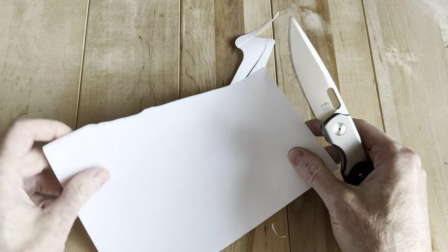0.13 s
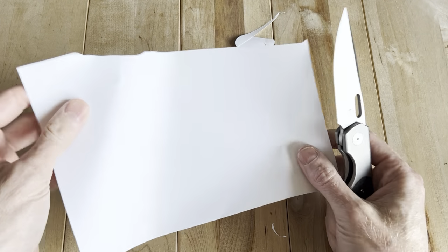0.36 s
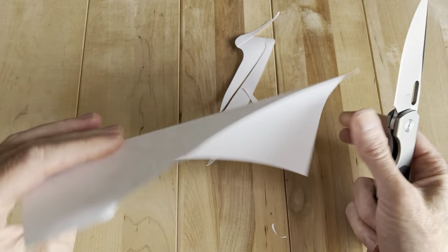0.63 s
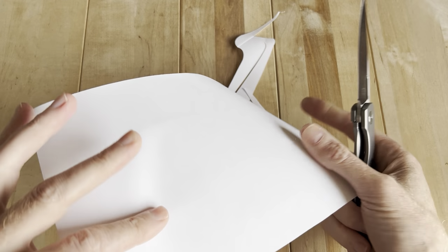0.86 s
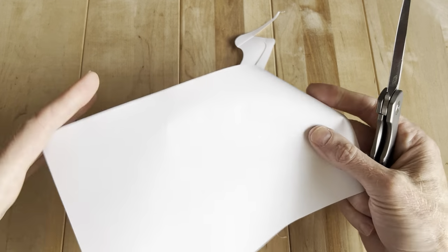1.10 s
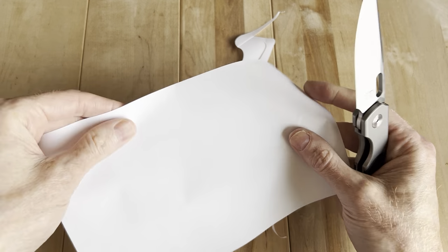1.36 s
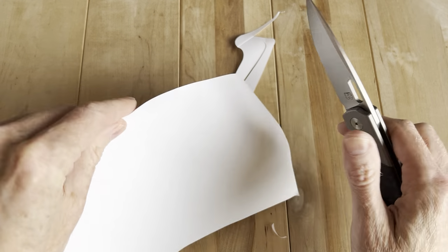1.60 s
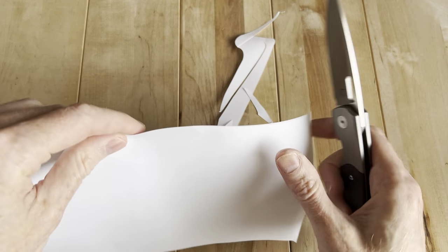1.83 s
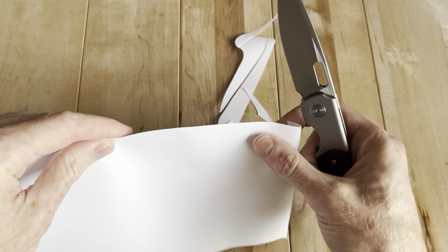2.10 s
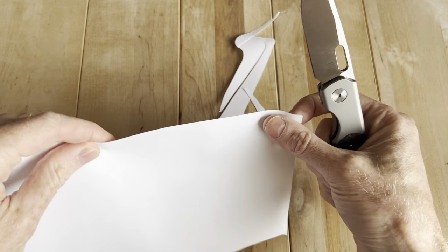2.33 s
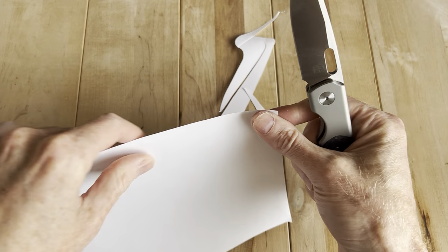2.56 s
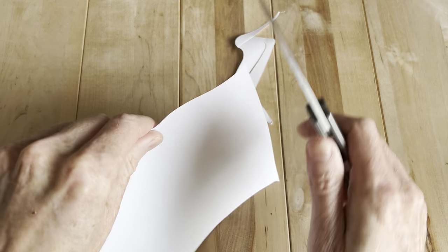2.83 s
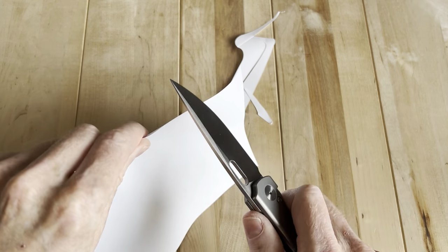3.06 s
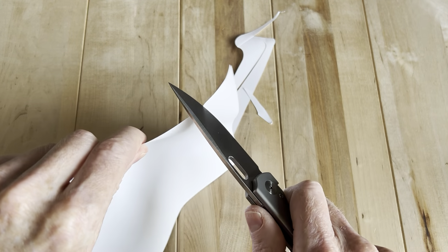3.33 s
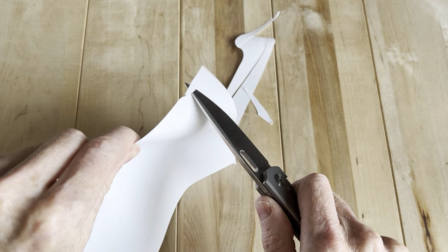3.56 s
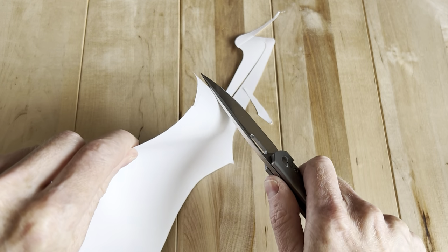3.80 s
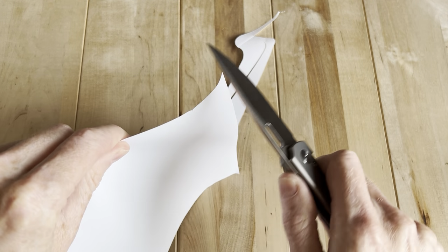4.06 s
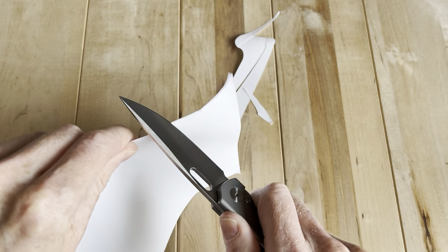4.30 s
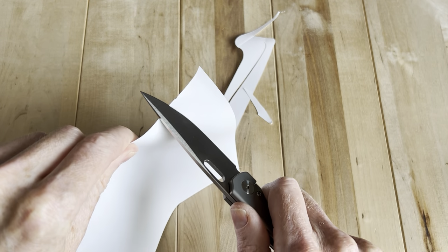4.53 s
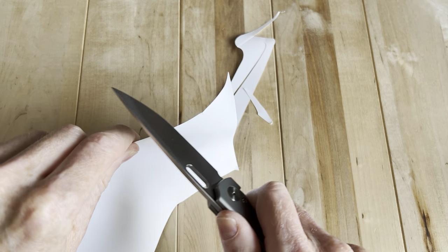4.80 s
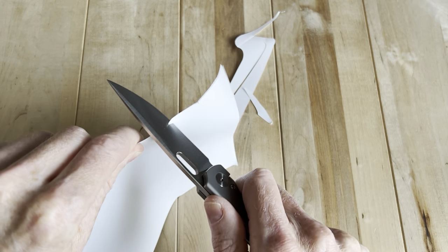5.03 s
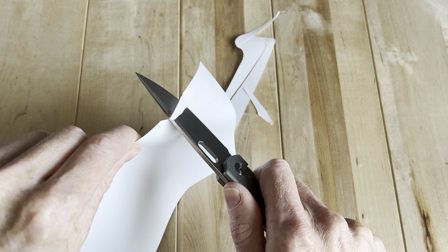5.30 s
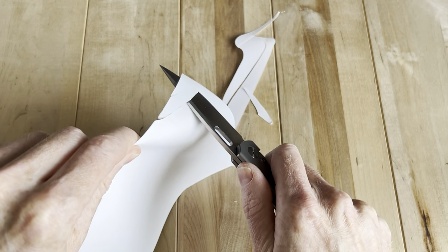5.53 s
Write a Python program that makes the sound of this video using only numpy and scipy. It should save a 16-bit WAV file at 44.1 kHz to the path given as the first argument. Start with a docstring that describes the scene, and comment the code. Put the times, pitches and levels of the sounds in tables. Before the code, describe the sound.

Paper rattles and pops as it is turned over, followed by a short bright knife cut, a brief lull, and a longer rasping cut.

```python
"""Two hands turn a sheet of paper over a wooden table, then draw a knife through it twice, close to a pair
of microphone ports. Clumped random clicks and smooth rubbing noise, filtered, make the scrape, flex and rasp;
bursts of banded noise make the snaps, crumples and rips of the sheet and one dull knock.
Low puffs and drifting low noise are the air fanned by the sheet, over short reflections and a faint hush."""
import sys
import numpy as np
from scipy import signal
from scipy.fft import rfft, irfft, next_fast_len
from scipy.io import wavfile
from scipy.ndimage import uniform_filter1d

SR = 44100
rng = np.random.default_rng(int(sys.argv[2]) if len(sys.argv) > 2 else 0)


def level_to_linear(level):
    """Convert decibel levels to linear amplitude factors, elementwise."""
    exponent = np.asarray(level, float) / 20
    return 10 ** exponent


def log_audio(samples):
    """Write samples as a 16-bit WAV file to the path given in sys.argv[1]."""
    # one column per channel
    frames = np.atleast_2d(samples).T
    # limit to full scale, then quantise
    limited = np.clip(frames, -1, 1)
    pcm = np.round(limited * 32767).astype(np.int16)
    wavfile.write(sys.argv[1], SR, pcm)


N = 249163

# grain of the tearing and rubbing: time_s, click_spread_db (negative: the rare ones are small),
# smooth_share of rub in the bending (0-1)
GRAIN = [(0, 2, 0.11), (3.35, 1, 0), (3.43, 2, 0.97), (3.62, -4, 0.75), (3.68, -3.5, 0.16),
         (3.76, 1.5, 0.85), (4.05, 0.5, 0.6), (4.2, 3, 0.24), (4.93, -1, 0.23), (5, -6, 0.74),
         (5.55, -1.5, 0.91), (5.65, -2, 0.6)]
# where the stressed sheet sings loudest: time_s, high_region_hz, low_region_hz, high_region_db re the rasp
SINGING = [(0.0,3000,800,-23.5), (0.16,2300,1290,-5), (0.4,2530,1110,-14), (0.68,2100,860,-10),
           (1.1,2520,850,-25), (1.45,2950,800,-22), (1.6,4300,800,-5.5), (1.67,3600,900,-1),
           (1.72,2740,980,-2), (2.0,2260,704,-8), (2.3,1970,850,-13), (2.55,1800,1100,-19),
           (2.83,2900,950,-2), (3.38,2500,800,-2), (3.45,2170,1000,-7), (3.51,2390,950,-14),
           (3.62,2520,920,-23), (3.68,2500,920,-19), (3.8,2780,900,-11.5), (3.91,3400,905,-30),
           (3.93,3100,900,0.5), (3.99,2600,850,9), (4.05,2300,780,7), (4.38,3150,900,-10),
           (4.5,3070,894,-9.5), (5.0,2680,1050,-5.5), (5.24,2700,700,-21), (5.39,2940,910,0.5),
           (5.47,2600,850,-1.5), (5.65,3160,800,-19)]


def rubbing():
    """Edge and fingers drag over the paper while it bends; both motions drive the sheet's sounds."""
    # hands turning the sheet over: time_s, sliding_db, bending_db
    turning = [(0.0,-48.5,-58.5), (0.08,-50.5,-62.5), (0.14,-46.5,-53.5), (0.23,-57,-52.5),
               (0.285,-58,-45.5), (0.31,-54,-63), (0.37,-51,-55), (0.425,-59,-60), (0.445,-54,-56),
               (0.5,-46.5,-50.5), (0.6,-52.5,-47), (0.72,-63.5,-52.5), (0.8,-56,-54), (0.88,-63.5,-54.5),
               (0.97,-47,-39), (1.02,-52.5,-57), (1.05,-57,-64), (1.07,-49,-46), (1.15,-56,-40),
               (1.2,-54,-45), (1.24,-59,-50), (1.28,-54,-47), (1.3,-56,-56), (1.33,-48,-35), (1.41,-40,-48),
               (1.46,-47,-47.5), (1.51,-53,-44.5), (1.545,-60,-57.5), (1.58,-57,-61), (1.61,-50,-47.5),
               (1.66,-50.5,-57.5), (1.71,-43.5,-51), (1.78,-52.5,-44), (1.84,-63,-68), (1.88,-76,-44),
               (1.92,-61,-54), (1.97,-60,-45), (2.1,-58,-57), (2.17,-54,-47), (2.265,-55.5,-59),
               (2.29,-53,-55), (2.35,-57.5,-48.5), (2.48,-57.5,-44), (2.62,-57.5,-57), (2.7,-64,-44),
               (2.82,-59,-52.5), (2.89,-59,-56), (3.05,-58,-64.5), (3.2,-61.5,-58.5), (3.24,-65,-46),
               (3.35,-59,-62), (3.39,-62,-47.5)]
    # hands holding the sheet between the cuts: time_s, sliding_db, bending_db
    holding = [(3.73,-43.5,-51), (3.794,-47.5,-63), (3.915,-51,-65), (3.925,-47.5,-53), (3.99,-59,-58),
               (4.04,-63,-63), (4.065,-75,-63), (4.124,-72,-65), (4.19,-73,-70.5), (4.3,-81,-65),
               (4.37,-53,-60.5), (4.4,-43.5,-47.5), (4.43,-42,-49), (4.455,-38.5,-48), (4.47,-44,-43),
               (4.485,-47,-51.5), (4.538,-53,-54), (4.63,-60,-61), (4.66,-61,-66), (4.722,-64,-71),
               (4.821,-73.5,-89), (4.86,-62.5,-72), (4.9,-59.5,-73), (4.93,-63,-81)]
    # two knife cuts, each a list of: time_s, tearing_db, bending_db
    cuts = [
        [(3.41, -40.5, -55.5), (3.456, -37.5, -46.5), (3.558, -33.5, -42.5), (3.586, -35.5, -40),
         (3.64, -30.5, -46), (3.656, -29, -39), (3.704, -29.5, -36.5), (3.715, -34, -49)],
        [(4.97, -46, -56), (5.004, -35.5, -50), (5.044, -34, -43), (5.112, -37, -48.5), (5.2, -34, -45.5),
         (5.23, -33, -43), (5.28, -36.5, -44.5), (5.38, -35, -40), (5.44, -34, -39), (5.506, -33, -35),
         (5.534, -32.5, -29.5), (5.562, -33.5, -36), (5.65, -24.5, -27.5)],
    ]
    smooth_share = along(GRAIN, column=2)
    drag = fibres(6000, 0.55, clump_db=2.6)
    bend = fibres(1200, smooth_share, clump_db=-1.5)
    hands = turning + cuts[0] + holding + cuts[1]
    dragging = np.hypot(level_to_linear(along(hands, column=1)), brushing())
    bending = level_to_linear(along(hands, column=2))
    sound = scrape(drag, dragging) + flex(bend, bending) + rasp(drag, bend, dragging, bending)
    # less creasing where the bending is a smooth rub
    creasing = level_to_linear(-9) * bending * np.sqrt(1 - np.clip(smooth_share, 0, 1))
    return sound + crinkles() * creasing


def fibres(per_s, smooth, clump_db):
    """Clicks of uneven strength in clumps, over a smooth rub."""
    draw, size = rng.random(N), rng.exponential(1, N)
    rub, clump = rng.standard_normal(N), rng.standard_normal(N)
    strength = level_to_linear(along(GRAIN) * np.minimum(size, 5))
    clicks = (draw < per_s / SR) * np.sign(rub) * strength
    # even out the running power so that only the grain changes
    clicks = clicks / np.sqrt(abs(uniform_filter1d(clicks ** 2, 8000)) + 1e-9)
    clumps = level_to_linear(clump_db * drifting(clump, 150))
    share = np.clip(smooth, 0, 1)
    return evened((np.sqrt(1 - share) * clicks + np.sqrt(share) * rub) * clumps)


def scrape(drag, dragging):
    """Torn and rubbed fibres radiate a bright hiss that follows the drag."""
    # colour of the scrape: pitch_hz, level_db
    scrape_colour = [(1500, -42), (3500, -9), (5000, -11.5), (6000, 3), (7500, 5), (9000, 1), (11000, 1),
                     (13000, 0), (15000, -2.5), (16500, 3.5)]
    return evened(colour(patchy(drag, patchy_db=2.0, size=25), scrape_colour)) * dragging


def flex(bend, bending):
    """The bending sheet radiates a low rustle, reinforced by its moving low region."""
    # colour of the flexing sheet: pitch_hz, level_db
    flex_colour = [(120, -22), (220, -7), (330, -8.5), (480, -7), (600, 0.5), (760, -0.5), (900, -1.5),
                   (1150, -4.5), (1400, -2), (1620, -13), (1850, -4.5), (3000, -22)]
    rustle = evened(colour(patchy(bend, patchy_db=2.5, size=25), flex_colour))
    low_song = evened(resonate(rustle, along(SINGING, column=2), 520))
    return evened(rustle + 0.28 * low_song) * bending


def rasp(drag, bend, dragging, bending):
    """Drag and bending together drive a mid-range rasp, a moving high region and taut resonances."""
    # colour of the rasp: pitch_hz, level_db
    rasp_colour = [(1000, -9.5), (1650, -15), (2000, -11), (2400, -12.5), (2900, -7), (3500, -5),
                   (3750, -6.5), (4100, -6.5), (4700, -8), (7000, -23)]
    fed = 0.75 * drag + 0.59 * bend
    grain = evened(colour(patchy(fed, patchy_db=2.5, size=25), rasp_colour))
    high_song = evened(resonate(grain, along(SINGING), 480))
    sheet = evened(grain + level_to_linear(along(SINGING, column=3)) * high_song)
    strength = np.hypot(level_to_linear(-3) * dragging, level_to_linear(-7.5) * bending)
    return (sheet + taut(fed)) * strength


def taut(fed):
    """Drag and bending excite narrow, gliding resonances of the taut sheet that come and go."""
    # resonances: start_s, end_s, start_pitch_hz, end_pitch_hz, level_db re the rasp
    resonances = [(3.4, 3.43, 2420, 2430, -5), (3.431, 3.467, 2040, 2090, 2),
                  (3.438, 3.52, 2550, 2880, -6.5), (3.483, 3.62, 1190, 1140, -15.5),
                  (3.548, 3.718, 860, 923, -16), (3.524, 3.72, 2430, 2480, -12),
                  (3.55, 3.72, 3040, 3480, -19), (3.456, 3.725, 4800, 4990, -9.5),
                  (3.457, 3.724, 5600, 5580, -6.5), (4.374, 4.5, 800, 835, -8),
                  (4.368, 4.49, 3330, 3230, -6), (4.382, 4.482, 2560, 2600, -9),
                  (4.973, 5.197, 1370, 1370, -22), (4.973, 5.25, 2660, 2700, -13),
                  (4.98, 5.2, 3770, 3670, -18), (5.0, 5.5, 4070, 3990, -17), (5.0, 5.2, 5240, 5150, -21),
                  (5.206, 5.246, 586, 575, -4.5), (5.19, 5.635, 990, 796, -9.5),
                  (5.2, 5.5, 1780, 1800, -8.5), (5.253, 5.65, 2840, 3020, -15),
                  (5.302, 5.65, 3570, 3470, -14), (5.414, 5.65, 2470, 2550, -8.5),
                  (5.447, 5.65, 1450, 1410, -15), (5.253, 5.65, 5840, 5850, -8),
                  (5.544, 5.65, 3880, 4100, -11)]
    width_hz = 60
    out = np.zeros(N)
    for start, end, hz0, hz1, db in resonances:
        part = fed[round(start * SR):round(end * SR)]
        hz = np.linspace(hz0, hz1, len(part))
        ring = resonate(part, hz, width_hz)
        ring = evened(resonate(ring, hz, 2 * width_hz))
        add(out, start, level_to_linear(db) * ring * signal.windows.tukey(len(part), .5))
    return out


def brushing():
    """Strength of fingertips brushing over the sheet: each brush swells and fades smoothly."""
    # brushes: peak_s, length_s, level_db
    brushes = [(0.398, 0.062, -48.5), (0.911, 0.057, -41.5), (1.071, 0.046, -40.5), (2.037, 0.14, -50.5),
               (2.492, 0.13, -50), (2.701, 0.13, -46), (2.742, 0.064, -52), (2.925, 0.05, -50),
               (3.133, 0.096, -52.5), (3.231, 0.085, -42.5), (4.337, 0.063, -49.5), (4.702, 0.084, -49)]
    out = np.zeros(N)
    for s, length, db in brushes:
        add(out, s - length / 2, level_to_linear(db) * np.hanning(round(length * SR)))
    return out


def crinkles():
    """Small creases tick at random as short decaying noise bursts, a few much louder than the rest."""
    # colour of the ticks: pitch_hz, level_db
    crinkle_colour = [(300, -20), (800, -6), (1500, -0.5), (3000, -8), (5000, -16), (9000, -19)]
    per_s, spread_db, t60_s = 160, 9.5, 0.018
    draw, size, t = rng.random(N), rng.exponential(1, N), np.arange(1500) / SR
    ticks = (draw < per_s / SR) * level_to_linear(spread_db * np.minimum(size, 3.5))
    shapes = rng.standard_normal((6, len(t))) * level_to_linear(-60 * t / t60_s)
    kind = rng.integers(0, len(shapes), N)
    out = np.zeros(N)
    for k, shape in enumerate(shapes):
        out += signal.oaconvolve(ticks * (kind == k), shape)[:N]
    return evened(colour(out, crinkle_colour))


def snaps():
    """Each burst: a bright crack, a rattling ring and a low thump."""
    out, t, singing = np.zeros(N), np.arange(6000) / SR, along(SINGING)
    events = bursts()
    noise = rng.standard_normal((len(events), 3, len(t)))
    for (s, peak_db, hz, crack_db, rise, t60), (a, b, c) in zip(events, noise):
        rattle = level_to_linear(3.8 * evened(uniform_filter1d(c, 40)))  # jerky level
        spread = level_to_linear(min(0.46 * crack_db + 7.0, 3))  # a crisper snap also rings over a wider range
        high = around(b * rattle, singing[round(s * SR)], 1.186)  # the sheet's high region answers
        wide = around(c * rattle, 1.34 * hz, 2.72) + 0.44 * high
        ring = around(a * rattle, hz, 1.535) + .5 * around(a, hz, 1.09) + spread * wide
        ring = shaped(ring, t, rise, t60)
        crack = shaped(bandpass(b * rattle, 4600, 15500, order=2), t, rise, 0.25 * t60) * level_to_linear(crack_db)
        thump = shaped(bandpass(c, 140, 480, order=2), t, rise, 1.44 * t60)
        thump = thump * level_to_linear(-9.5) * 700 / hz  # a lower ring brings a stronger thump
        add(out, s - rise, level_to_linear(peak_db) * (ring + crack + thump))
    return out


def bursts():
    """Every snap, knock, crumple and rip as (peak s, ring dB, ring Hz, crack dB re ring, rise s, t60 s)."""
    # sharp snaps, and one dull knock at 4.06 s: peak_s, level_db, ring_hz, crack_db, t60_s
    sharp = [(0.1037, -32, 1550, -55, 0.015), (0.438, -43.5, 1700, -45, 0.03),
             (0.2014, -25.5, 1500, -28, 0.034), (0.1912, -26, 2070, -36, 0.027),
             (0.5019, -19, 1100, -17.5, 0.036), (0.829, -25.5, 895, -41, 0.04),
             (0.9141, -29.5, 740, -31, 0.027), (0.945, -21.5, 830, -18, 0.049),
             (1.0093, -34.5, 950, -32, 0.12), (1.0979, -19, 850, -3, 0.052),
             (1.392, -18.5, 786, -26, 0.041), (1.4052, -22.5, 840, 8.5, 0.037),
             (1.5943, -35, 514, -13, 0.021), (1.858, -31.5, 706, -26, 0.01), (1.879, -40, 650, 0.5, 0.077),
             (1.9716, -24.5, 900, -12, 0.026), (1.9769, -27, 680, -16, 0.02),
             (2.1513, -19, 2540, -11, 0.022), (2.2773, -26.5, 2100, 6, 0.018),
             (2.2798, -26, 1830, -25, 0.036), (2.4687, -35, 2300, -35, 0.032),
             (2.6357, -38.5, 1830, -46, 0.065), (2.7122, -28.5, 1180, -27, 0.024),
             (3.3755, -40.5, 2320, 2, 0.028), (3.407, -43, 2200, -24, 0.15),
             (4.0588, -26.5, 620, -35, 0.018), (4.2072, -41.5, 1450, -2, 0.057),
             (4.283, -49, 2400, -17, 0.039), (4.314, -45, 2080, -1.5, 0.093), (4.837, -49, 2200, -16, 0.06)]
    # folds that crumple softly: peak_s, level_db, ring_hz, crack_db, rise_s, t60_s
    crumples = [(0.1351, -42.5, 2600, -27, 0.0063, 0.64), (0.198, -20, 1436, -42, 0.0066, 0.019),
                (0.254, -42, 1250, -65, 0.017, 0.17), (0.341, -30, 1134, -36, 0.023, 0.071),
                (0.444, -40.5, 1090, -54, 0.011, 0.1), (0.465, -35, 940, -39, 0.011, .06),
                (0.476, -31, 890, -15, 0.013, 0.073), (0.485, -30.5, 700, -34, 0.0088, 0.046),
                (0.4979, -32, 880, -29, 0.013, 0.22), (0.6258, -37, 675, -13, .015, 0.1),
                (0.6436, -36.5, 1600, -20, .015, 0.045), (0.762, -38.5, 765, -13.5, .012, 0.057),
                (0.8015, -38, 820, -12, .015, 0.23), (0.903, -37, 2320, -2, 0.006, 0.076),
                (1.0657, -28, 660, -12, 0.011, 0.078), (1.0818, -33.5, 1580, -17, 0.012, 0.016),
                (1.123, -28.5, 1030, -15, 0.011, 0.058), (1.1915, -28.5, 870, -19, 0.023, 0.13),
                (1.2738, -36.5, 1200, -13.5, 0.023, 0.039), (1.3239, -27.5, 906, -15.5, 0.0099, 0.069),
                (1.3597, -29, 965, 1.5, 0.013, 0.062), (1.48, -43, 905, -31, .01, 0.054),
                (1.5055, -38.5, 734, -37, .008, 0.1), (1.525, -43, 1520, -46, .015, 0.1),
                (1.661, -40, 3300, -52, .015, 0.078), (1.692, -39.5, 1800, -4, 0.0041, 0.038),
                (1.7205, -31.5, 1270, -3.5, .004, 0.047), (1.7419, -30.5, 710, -15, 0.0062, 0.075),
                (1.764, -31.5, 1790, -30, .005, 0.031), (1.8982, -38.5, 3020, -19, 0.014, 0.016),
                (1.936, -36, 2530, -12, 0.014, 0.075), (1.944, -39, 640, -16, 0.0058, 0.013),
                (1.9605, -31, 614, -22, .015, 0.084), (2.0457, -39, 724, -32, .015, 0.038),
                (2.0894, -44.5, 2290, -18, 0.012, 0.028), (2.14, -39, 3270, -28, 0.039, 0.13),
                (2.1994, -51.5, 1070, 8, .015, 0.022), (2.296, -27, 780, -46, 0.0097, 0.019),
                (2.3144, -38, 990, -24, .012, 0.024), (2.415, -41.5, 940, -7.5, 0.014, 0.06),
                (2.4505, -41.5, 736, -13, 0.014, 0.35), (2.482, -33, 1140, -20, 0.0041, 0.082),
                (2.49, -37, 1760, -37, 0.0058, 0.087), (2.527, -33, 1670, -62, 0.0031, 0.043),
                (2.736, -32.5, 880, -10, 0.0043, 0.083), (2.7713, -38.5, 710, -22, .015, 0.063),
                (2.8083, -30.5, 1060, -20, 0.013, 0.032), (2.9323, -39, 2700, -13, 0.021, 0.056),
                (2.966, -42.5, 430, -11, 0.01, 0.046), (3.0208, -47, 1840, -10, .015, 0.3),
                (3.2246, -41.5, 2050, -17, .012, 0.12), (3.444, -41, 2420, -33, .01, 0.22),
                (4.249, -59.5, 2000, -12, 0.0069, 0.052), (4.917, -51.5, 2800, -29, .015, 0.041)]
    # bundles of fibres ripping as the edge nears the rim: peak_s, level_db
    rips = [(3.612, -44), (3.635, -37), (3.644, -38), (3.652, -31), (3.659, -28), (3.6683, -24.5),
            (3.681, -48), (3.694, -22), (3.702, -24), (3.721, -30), (5.449, -34), (5.49, -36), (5.607, -29),
            (5.625, -38), (5.632, -22.5), (5.638, -27), (5.6414, -25), (5.6445, -29)]
    sharp_rise_s = 0.001344
    rip_hz, rip_crack_db, rip_rise_s, rip_t60_s = 2600, -3, 0.003, 0.012
    snapped = [(*row[:4], sharp_rise_s, row[4]) for row in sharp]
    ripped = [(s, db, rip_hz, rip_crack_db, rip_rise_s, rip_t60_s) for s, db in rips]
    return snapped + crumples + ripped


def shaped(x, t, rise, t60):
    """Gives noise a quick rise and an exponential decay, with the energy of that envelope."""
    fade = level_to_linear(-60 * np.maximum(t - rise, 0) / t60) * np.minimum(t / rise, 1) ** 1.57
    return x * fade * np.linalg.norm(fade) / np.linalg.norm(x * fade)


def flaps():
    """The whole sheet flaps once: a short soft puff of low pressure waves."""
    # flaps: peak_s, level_db (rms at the peak), pitch_hz
    flap_rows = [(0.488, -32.5, 85), (1.084, -37.5, 84.5), (1.335, -40.5, 75), (1.959, -43.5, 80),
                 (1.986, -40, 97), (3.725, -53, 65)]
    cycles = 2.78
    out = np.zeros(N)
    for s, db, hz in flap_rows:
        t = np.arange(0, cycles / hz, 1 / SR)
        wave = np.hanning(len(t)) * np.sin(2 * np.pi * hz * t)
        add(out, s - t[-1] / 2, np.sqrt(2) * level_to_linear(db) * wave)
    return out


def fanned_air():
    """The waving sheet pushes lumps of air at the ports."""
    # colour of the moving air: pitch_hz, level_db
    air_colour = [(20, -60), (40, -18), (58, -5.5), (95, -9.5), (150, -11), (260, -17.5), (500, -16.5)]
    # strength of the fanning: time_s, level_db
    fanning = [(0.0,-52.5), (0.1,-70), (0.2,-55.5), (0.43,-60.5), (0.485,-50), (0.56,-52), (0.62,-50),
               (0.69,-59), (0.8,-46), (0.89,-58), (0.96,-45), (1.0,-56), (1.07,-50.5), (1.4,-48.5),
               (1.57,-56), (1.61,-50), (1.68,-69), (1.78,-47), (1.9,-56.5), (1.97,-42), (2.04,-52.5),
               (2.14,-63.5), (2.37,-46.5), (2.6,-60.5), (2.72,-53), (2.82,-50.5), (2.9,-64), (3.19,-65.5),
               (3.24,-50.5), (3.34,-64), (3.66,-62.5), (3.72,-46.5), (3.88,-78), (4.07,-63), (4.28,-65),
               (4.32,-62), (4.5,-65), (4.8,-82), (5.0,-69.5), (5.3,-73), (5.65,-72)]
    lumps = level_to_linear(2. * drifting(rng.standard_normal(N), 900))
    return evened(colour(rng.standard_normal(N) * lumps, air_colour)) * level_to_linear(along(fanning))


def faint_hush():
    """Steady noise, strongest at the bottom, far below the paper."""
    points = [(30, 24), (100, -33), (1000, -4.0), (16000, -21.0)]  # pitch_hz, level_db
    return level_to_linear(-82) * evened(colour(rng.standard_normal(N), points))


def room(x):
    """Table top and walls: sparse taps of random sign that die away."""
    t60_s = 0.094
    at = np.arange(300, 15000, 22)
    taps = np.zeros(15022)
    signs = rng.choice([-1., 1.], len(at))
    taps[at + rng.integers(0, 22, len(at))] = signs * level_to_linear(-60 * at / SR / t60_s)
    return signal.oaconvolve(x, taps / np.linalg.norm(taps))[:N]


def stereo(x):
    """Stereo difference by pitch: phase, level, and a part that shifts in patches."""
    # left against right: pitch_hz, left_lead_rad, left_minus_right_db, likeness (0-1)
    difference = [(0, 0, 0, .985), (100, 0, -1, .92), (200, 0, -3.5, .78), (280, 0, -4.5, .8),
                  (600, 0.1, -2, .84), (1100, .2, -1.5, .72), (1400, -.5, -.5, .45), (1700, 1.1, .5, .55),
                  (2150, 0, .3, .99), (2500, -.1, 0, .99), (3200, -.8, -.5, .82), (5000, -1, -2.5, .7),
                  (5600, 2.1, -3, .6), (6400, 2.3, -2, .8), (6900, np.pi, 0, .98), (7150, np.pi, 0, .98),
                  (7900, 4.7, 0, .9), (9000, 2 * np.pi, 0, 1), (10000, 2 * np.pi, 0, 1),
                  (11800, 8.6, 0, .9), (12200, 3 * np.pi, 0, 1), (13050, 3 * np.pi, 0, 1),
                  (13300, 10.1, 0, .9), (15300, 4 * np.pi, 0, 1)]
    size = next_fast_len(N + 8192)
    hz = np.fft.rfftfreq(size, 1 / SR)
    f, lead, tilt_db, same = np.transpose(difference)
    lead, tilt_db = np.interp(hz, f, lead), np.interp(hz, f, tilt_db)
    same = np.interp(hz, f, np.clip(same, 0, 1))
    shared = rfft(x, size) * np.sqrt((1 + same) / 2)
    apart = rfft(patchy(x, patchy_db=3.5, size=150, turns=1.55), size) * np.sqrt((1 - same) / 2)
    side = np.array([[1], [-1]])  # left, right
    pair = (shared + side * apart) * np.exp(.5j * side * lead) * level_to_linear(side * tilt_db / 2)
    return swayed(irfft(pair, size)[:, :N])


def swayed(pair):
    """Turns the phase of one channel against the other in drifting patches, more in the treble."""
    sway_rad, full_hz = .24, 5000
    hz, _, z = signal.stft(pair, SR, nperseg=512)
    field = rng.standard_normal(z.shape[:0:-1]).T
    field = evened(uniform_filter1d(uniform_filter1d(field, size=16, axis=0), size=10, axis=1))
    turn = sway_rad * np.minimum(hz / full_hz, 1)[:, None] * field
    return signal.istft(z * np.exp(.5j * np.array([turn, -turn])), nperseg=512)[1][:, :N]


def evened(x):
    """Scales to rms 1."""
    return x / np.sqrt(np.mean(x ** 2) + 1e-20)


def along(rows, column=1):
    """One column of a curve at every sample."""
    rows = np.array(rows)
    return np.interp(np.arange(N) / SR, rows[:, 0], rows[:, column])


def add(mix, s, sound):
    """Lays a sound into the mix at time s."""
    part = mix[round(s * SR):][:len(sound)]
    part += sound[:len(part)]


def drifting(noise, size):
    """Noise smoothed twice over size samples into a slow drift of rms 1."""
    return evened(uniform_filter1d(uniform_filter1d(noise, size), size))


def bandpass(x, low_hz, high_hz, order):
    """Causal Butterworth band."""
    return signal.sosfilt(signal.butter(order, [low_hz, high_hz], "band", fs=SR, output="sos"), x)


def around(x, hz, ratio):
    """Band from hz / ratio to hz * ratio at rms 1."""
    return evened(bandpass(x, hz / ratio, hz * ratio, order=3))


def colour(x, points):
    """Causal minimum-phase filter with the given spectrum, scaled to unit energy."""
    f, db = np.transpose(points)
    hz = abs(np.fft.fftfreq(4096, 1 / SR))
    log_gain = np.log(level_to_linear(np.interp(np.log(hz + 1), np.log(f + 1), db, -90, -60)))
    taps = np.fft.ifft(np.exp(np.conj(signal.hilbert(log_gain)))).real[:2048]
    return signal.oaconvolve(x, taps / np.linalg.norm(taps))[:len(x)]


def patchy(x, patchy_db, size, turns=0):
    """Narrow drifting streaks of level (and phase) in time and pitch."""
    z = signal.stft(x, nperseg=384, noverlap=288)[2]
    field = rng.standard_normal(z.shape[::-1]).T
    # smooth over 2 pitch bins and size time frames
    field = evened(uniform_filter1d(uniform_filter1d(field, 2, 0), size, 1))
    z = z * level_to_linear(patchy_db * field) * np.exp(2j * np.pi * turns * field)
    return signal.istft(z, nperseg=384, noverlap=288)[1][:N]


def resonate(x, hz, width):
    """Shifts the curve hz down to zero, smooths, and shifts back: a moving resonance."""
    turn, r = np.exp(2j * np.pi * np.cumsum(hz) / SR), np.exp(-np.pi * width / SR)
    return 2 * (turn * signal.lfilter([1 - r], [1, -r], x / turn)).real


def scene():
    """Paper close to the ports in a small room, with fanned air over a faint hush."""
    paper = rubbing() + snaps()
    reflected = level_to_linear(-13) * room(paper)
    return stereo(paper + reflected + fanned_air() + flaps() + faint_hush())


def roll_off(x):
    """The treble ends steeply here."""
    return signal.sosfilt(signal.butter(12, 17080, fs=SR, output="sos"), x)


def record(dry):
    """Limits the band of both channels with a steep linear-phase low-pass at 15.8 kHz."""
    lowpass = signal.firwin(767, 15800, window=("kaiser", 9), fs=SR)
    finished = signal.oaconvolve(dry, lowpass[None], "same")
    return roll_off(finished)


dry = scene()
out = record(dry)
log_audio(out)
```